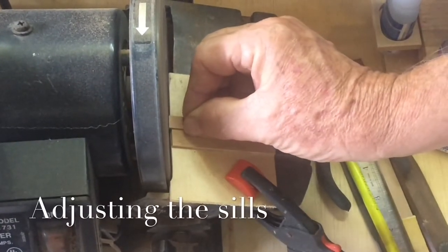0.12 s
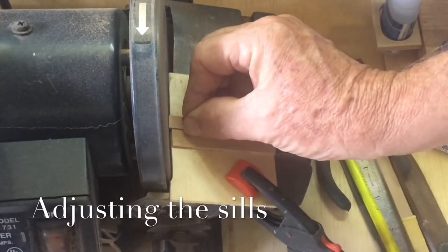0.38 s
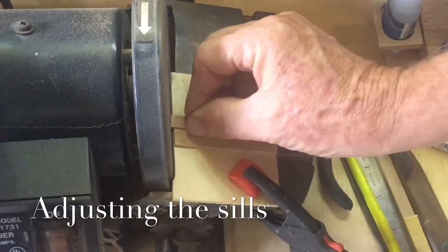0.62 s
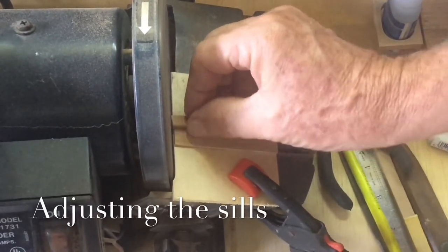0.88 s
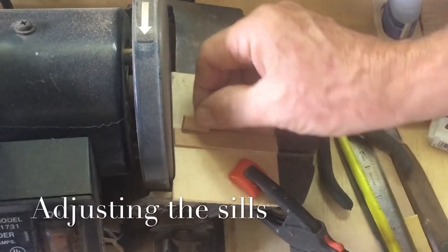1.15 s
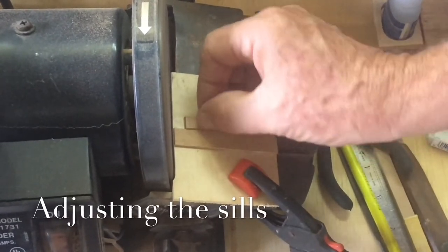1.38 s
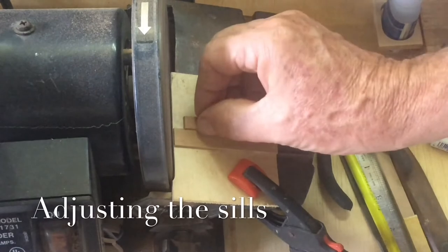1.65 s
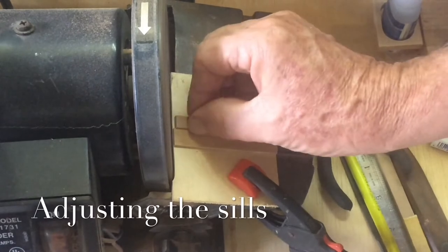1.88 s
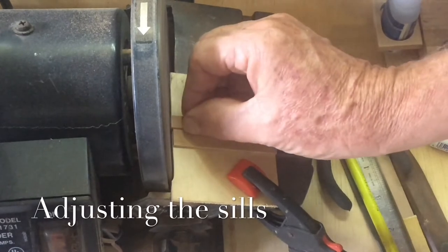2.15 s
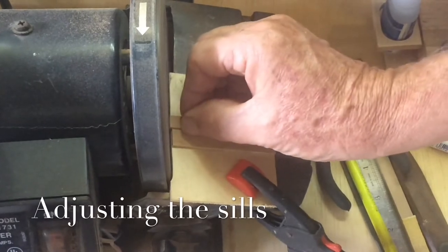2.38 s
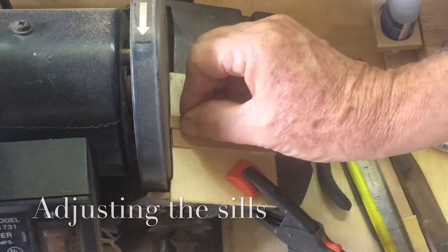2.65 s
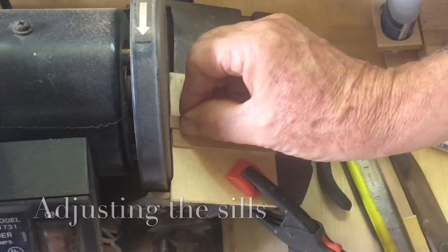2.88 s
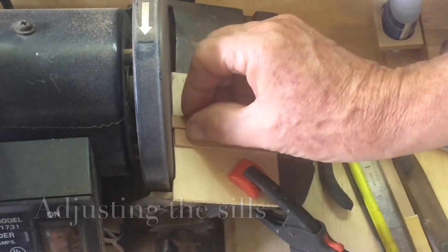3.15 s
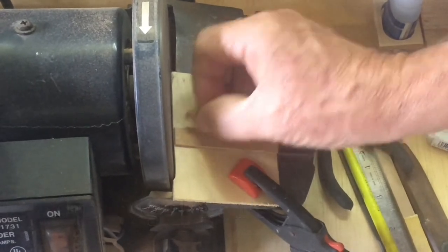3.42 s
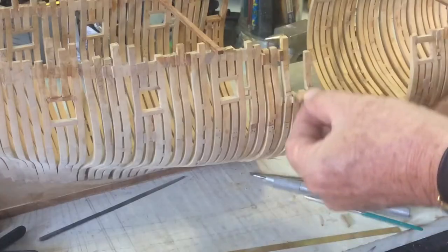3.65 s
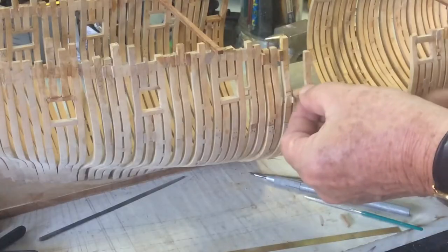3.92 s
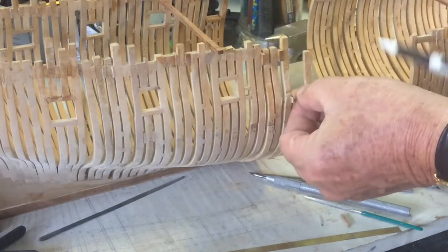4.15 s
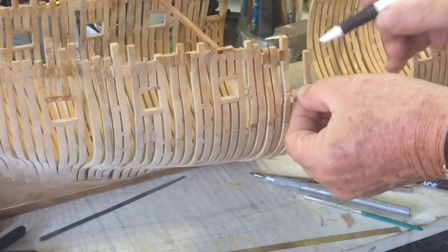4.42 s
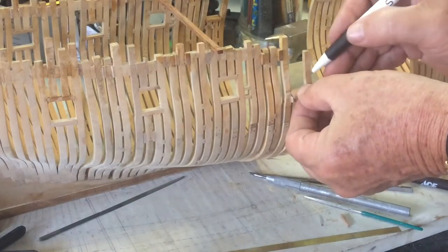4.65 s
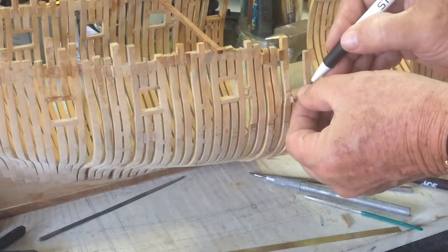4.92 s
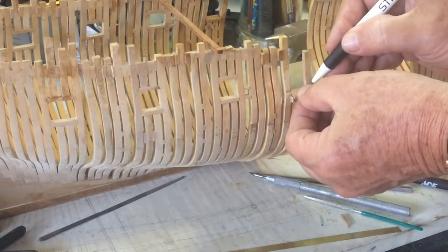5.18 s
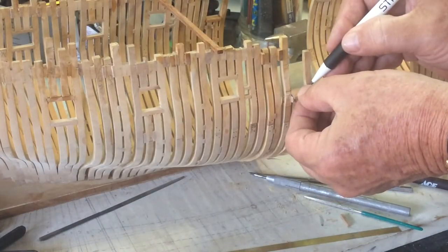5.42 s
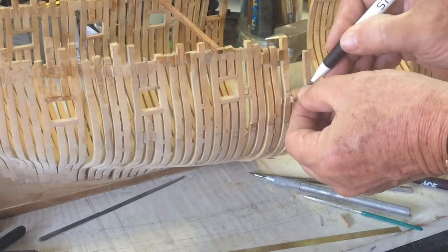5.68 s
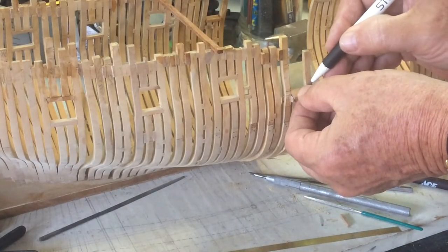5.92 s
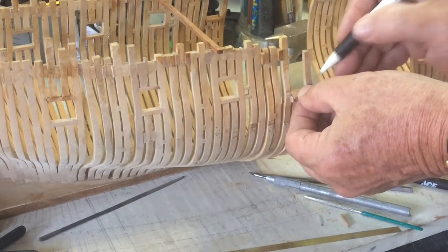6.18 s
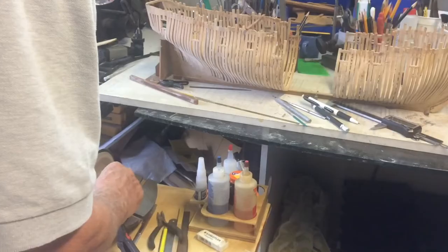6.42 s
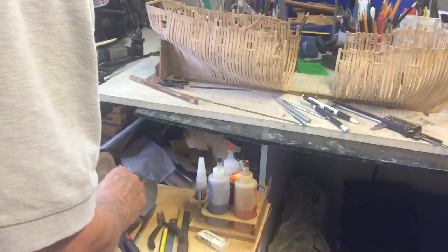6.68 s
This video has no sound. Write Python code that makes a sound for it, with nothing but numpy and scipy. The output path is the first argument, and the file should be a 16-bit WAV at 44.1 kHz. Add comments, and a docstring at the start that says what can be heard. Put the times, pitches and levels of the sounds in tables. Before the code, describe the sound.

A loud bench disc sander rasps against wood twice, cuts to a quiet humming workbench with small wooden clicks, then the sander roars farther off.

```python
"""First a bench disc sander heard close: noise through housing resonances, a throbbing bearing hiss, motor sines;
a small wooden piece is pressed twice on the grit, whose pattern repeats as one waveform per turn.
Then a quiet workbench: a beating fan-motor hum in room air, wooden parts that crack and ring, two thin squeaks.
Last, the sander from across the shop: fluttering noise through hollow resonances, with two tones.
The sound fades out and in at each change of place."""
import sys
import numpy as np
from scipy import signal
from scipy.fft import rfft, irfft, next_fast_len
from scipy.io import wavfile
from scipy.ndimage import map_coordinates

SR = 44100
rng = np.random.default_rng(int(sys.argv[2]) if len(sys.argv) > 2 else 0)


def voltage_ratio(level):
    """Linear amplitude factor for a level in decibels (scalar or array-like)."""
    return 10 ** (np.asarray(level, float) / 20)


def wav_record(signal):
    """Record a signal, one row per channel, as 16-bit PCM in the file named by sys.argv[1]."""
    frames = np.transpose(np.atleast_2d(signal))
    bounded = np.clip(frames, -1, 1)
    # unit amplitude maps onto the largest positive 16-bit level
    quanta = np.round(bounded * 32767).astype(np.int16)
    wavfile.write(sys.argv[1], SR, quanta)


N = 300321
TIME = np.arange(N) / SR


def in_time(rows, t):
    """Columns of a curve table, interpolated along its first column at t."""
    s, *columns = np.transpose(rows)
    return [np.interp(t, s, column) for column in columns]


def drift(rate_hz, size=N):
    """Random curve of spread 1: noise points joined by straight lines, two per cycle."""
    points = rng.standard_normal(size // 8 + 2)
    position = np.arange(size) * 2 * rate_hz / SR
    return 1.22 * np.interp(position, np.arange(len(points)), points)


def bell(hz, centre_hz, width_hz):
    """Resonance curve, 1 on top."""
    return 1 / (1 + (2 * (hz - centre_hz) / width_hz) ** 2)


# Time spans of the three places. Each row: fade-in start, fade-in end, fade-out start, fade-out end, all in seconds.
PLACE_FADES = [(-1, -.5, 3.462, 3.505), (3.505, 3.545, 6.335, 6.372), (6.372, 6.412, 8, 9)]


def coloured(place, spectrum, peaks=(), patchy_db=0., flicker_hz=11.0):
    """Noise for one place through a spectrum and resonances, as seven octave bands that flicker; sum of rms 1."""
    a, b = np.clip(np.searchsorted(TIME, [PLACE_FADES[place][0], PLACE_FADES[place][-1]]), 0, N)
    size = next_fast_len(b - a)
    hz = np.maximum(np.fft.rfftfreq(size, 1 / SR), 1)
    points = np.array(spectrum)
    db = np.interp(np.log(hz), np.log(points[:, 0]), points[:, 1])
    db = db + sum(lift_db * bell(hz, centre_hz, width_hz) for centre_hz, width_hz, lift_db in peaks)
    shaped = rfft(rng.standard_normal(size)) * voltage_ratio(db)
    shared = drift(flicker_hz / 2, size)
    octave = np.clip(np.log2(hz / 125), 0, 6)
    bands = np.zeros((7, N))
    for k in range(len(bands)):
        band = irfft(shaped * np.clip(1 - abs(octave - k), 0, 1), size)
        flicker = voltage_ratio(patchy_db * (shared + drift(flicker_hz, size)))
        bands[k, a:b] = (band * flicker)[:b - a]
    return bands / np.sqrt(np.mean(bands[:, a:b].sum(axis=0) ** 2))


def tones(lines, waver_db, rate_hz):
    """Sines of fixed pitch whose strength wavers."""
    total = np.zeros(N)
    for hz, db in lines:
        level = np.sqrt(2) * voltage_ratio(db + waver_db * drift(rate_hz))
        total += level * np.sin(2 * np.pi * (hz * TIME + rng.random()))
    return total


# Far roar spectrum. Each row: frequency in Hz, relative density in dB per Hz.
FAR_ROAR_SPECTRUM = [(40, -48), (110, -25), (170, -29), (300, -17), (600, -15.5), (900, -11.5),
                     (1430, -13.5), (2100, -11.5), (3300, -14.5), (8040, -15.5), (13000, -19.5),
                     (15700, -23), (16000, -70)]
# Housing resonances, far. Each row: centre in Hz, width in Hz, lift in dB.
FAR_RESONANCES = [(702, 67, 11.5), (878, 73, 11), (1120, 30, 9), (1320, 50, 8), (1586, 106, 16),
                  (1934, 76, 8.5), (2280, 16, 6), (2735, 66, 9), (3014, 66, 13.5), (5000, 150, 5),
                  (7800, 300, 7)]
# Motor tones, far. Each row: frequency in Hz, level in dB rms.
FAR_MOTOR_TONES = [(118.4, -54.5), (231.5, -41.5)]
FAR_ROAR_DB = -21.5


def far_sander():
    """The same machine across the shop: noise rings hollow resonances and flutters fast, with a gritty edge."""
    roar = coloured(2, FAR_ROAR_SPECTRUM, FAR_RESONANCES, patchy_db=0.54, flicker_hz=22.0).sum(axis=0)
    grit_edge = voltage_ratio(0.8 * drift(500.))
    return voltage_ratio(FAR_ROAR_DB) * roar * grit_edge + tones(FAR_MOTOR_TONES, waver_db=3.0, rate_hz=6.)


# Room air spectrum. Each row: frequency in Hz, relative density in dB per Hz.
AIR_SPECTRUM = [(30, -20), (60, -13), (100, -1), (150, -2), (270, -2.5), (380, -1), (500, -5.5), (800, -7),
                (1100, -13.5), (2000, -17), (5250, -20.5), (8500, -21.5), (12000, -25.5), (15700, -28),
                (16000, -70)]
AIR_DB_RMS = -41


def room_air():
    """Noise of the quiet shop, its octaves flickering slightly."""
    return voltage_ratio(AIR_DB_RMS) * coloured(1, AIR_SPECTRUM, patchy_db=0.4, flicker_hz=9.).sum(axis=0)


# Fan motor hum. Each row: frequency in Hz, level in dB rms.
FAN_TONES = [(145.3, -53), (193.3, -52.5), (230.2, -34)]
BEAT_HZ, BEAT_DEPTH, BEAT_TOP_S = 9.7, 0.19, 4.155


def fan_motor():
    """Low motor tones that beat evenly together."""
    beat = 1 + BEAT_DEPTH * np.cos(2 * np.pi * BEAT_HZ * (TIME - BEAT_TOP_S))
    return beat * tones(FAN_TONES, waver_db=.5, rate_hz=4.)


# Thin squeaks. Each row: start in seconds, length in seconds, first Hz, last Hz, width in Hz, level in dB.
THIN_SQUEAKS = [(4.417, 0.09, 12700, 11400, 400, -31.5), (4.935, 0.11, 1850, 1710, 89, -41)]


def squeaks():
    """A narrow band of noise slides quickly down to its pitch and dies away, with hiss above it."""
    out = np.zeros(N)
    for start_s, length_s, first_hz, last_hz, width_hz, db in THIN_SQUEAKS:
        t = TIME[:int(length_s * SR)]
        pitch_hz = last_hz + (first_hz - last_hz) * np.exp(-t / 0.0076)
        phase = 2 * np.pi * np.cumsum(pitch_hz) / SR
        core = drift(width_hz, len(t)) * np.cos(phase) + drift(width_hz, len(t)) * np.sin(phase)
        above = drift(3.0 * width_hz, len(t)) * np.cos(1.09 * phase)
        shape = np.minimum(t / 0.02, 1) * voltage_ratio(-22 * t / length_s)
        at = int(start_s * SR)
        out[at:at + len(t)] += voltage_ratio(db) * shape * (core + 0.5 * above)
    return out


# Wooden parts touching. Each row: start in seconds, level in dB, main ring in Hz, share of crack 0-1.
CONTACTS = [(3.525, -22, 2480, 0.8), (3.566, -19, 2060, 0.6), (3.576, -21, 8000, 0.7),
            (3.586, -13, 2010, 0.66), (3.597, -20.5, 1990, 0.3), (3.609, -15, 850, 0.22),
            (3.621, -31, 900, 0.5), (3.693, -27, 3930, 0.6), (3.699, -22.5, 2000, 0.62),
            (3.792, -29.5, 1700, 0.64), (3.822, -32.5, 1500, 0.5), (3.845, -36, 1800, 0.6),
            (5.335, -41, 1390, 0.1), (5.367, -37.5, 1500, 0.06), (5.578, -41, 1500, 0.5),
            (5.667, -33, 1800, 0.7), (6.086, -30, 6600, 0.63), (6.283, -37, 6200, 0.1)]
# Partials of a wooden part, scaled by its size. Each row: ratio to the main ring, level in dB.
WOOD_PARTIALS = [(1, 3), (1.15, -4), (1.62, -7.5), (0.54, -13.5)]
RING_T60_AT_1KHZ_S, RING_T60_SLOPE = 0.046, 0.49   # small high parts die sooner


def knocks():
    """Each contact: a broad dry crack and a short, rough woody ring, then a faint room tail."""
    out = np.zeros(N)
    t = TIME[:SR // 4]
    for start_s, db, hz, crack in CONTACTS:
        t60_s = RING_T60_AT_1KHZ_S * (1000 / hz) ** RING_T60_SLOPE
        noise = signal.lfilter([.6], [1, -.55], rng.standard_normal((2, len(t))))
        snap = noise[0] * (voltage_ratio(-60 * t / 0.0095) + voltage_ratio(-3.5 - 60 * t / 0.092))
        ring = np.zeros(len(t))
        for ratio, level_db in WOOD_PARTIALS:
            partial = np.sin(2 * np.pi * (hz * ratio * t + rng.random()))
            rub = 1 + 0.49 * drift(0.11 * hz, len(t))   # the parts rub as they meet
            ring += voltage_ratio(level_db - 60 * t / t60_s) * partial * rub
        tail = signal.lfilter([.3], [1, -.8], noise[1]) * voltage_ratio(-14.5 - 60 * t / 0.27)
        rise = np.minimum(t / 0.00063, 1)
        knock = rise * (0.89 * crack * snap + (1 - crack) * ring + tail)
        at = int(start_s * SR)
        out[at:at + len(t)] += voltage_ratio(db) * knock[:N - at]
    no_bass = signal.butter(2, 350, "high", fs=SR, output="sos")   # small parts give no bass
    return signal.sosfilt(no_bass, out)


def workbench():
    """Room air and fan motor under the handling sounds."""
    return room_air() + fan_motor() + knocks() + squeaks()


TOUCH_S, LIFT_S = .012, .03   # fade in ahead of the first row, fade out after the last


def pressed(rows, t):
    """0-1: the wood meets the disc quickly and leaves it a little slower."""
    rise = (t - rows[0][0]) / TOUCH_S + 1
    fall = (rows[-1][0] - t) / LIFT_S + 1
    return np.clip(np.minimum(rise, fall), 0, 1)


# Close roar spectrum. Each row: frequency in Hz, relative density in dB per Hz.
ROAR_SPECTRUM = [(150, -42), (220, -28.5), (320, -13.5), (500, -13.5), (610, -14), (800, -9), (1150, -14),
                 (1600, -13.5), (2700, -13), (8500, -15.5), (12900, -15), (14500, -22.5), (15300, -23),
                 (15600, -70)]
# Housing resonances, close. Each row: centre in Hz, width in Hz, lift in dB.
RESONANCES = [(344, 63, 5), (415, 49, 15), (456, 8.6, 13), (666, 7.1, 5), (779.4, 41, 9), (850, 14, 6),
              (995, 33, 7.5), (1300, 143, 11), (1487, 94, 5), (2185, 36, 6), (2630, 67, 4)]
# Rumble spectrum. Each row: frequency in Hz, relative density in dB per Hz.
RUMBLE_SPECTRUM = [(25, -19), (80, -4), (125, 4.5), (230, 0.5), (300, 3), (400, -36)]
# Motor tones, close. Each row: frequency in Hz, level in dB re the rumble reference.
MOTOR_TONES = [(59.4, -13), (118.4, -5.5), (142, -10.5), (178, -10.5), (231.5, -8)]
# Bearing throb of the treble hiss. Each row: multiple of the cage rate, depth 0-1.
BEARING_THROB = [(1, 0.11), (3, 0.09), (4, 0.08), (7, 0)]
CAGE_HZ = 22.92   # the ball cage of the bearing turns slower than the shaft
ROAR_DB, MACHINE_WANDER_DB = -17, 0.03   # before the gain control
RUMBLE_REF_DB, RUMBLE_WANDER_DB = -38.5, 0.5
RUMBLE_SUPPRESSED_DB = -2   # the recorder's noise suppression lowers the rumble while wood is pressed on


def idling():
    """Air roar rings the housing; the bearing makes the treble throb; motor tones sit in the rumble."""
    machine_db = MACHINE_WANDER_DB * drift(1.41)
    suppression_db = RUMBLE_SUPPRESSED_DB * sum(pressed(rows, TIME) for rows in WOOD_TOUCHES)
    rumble_db = RUMBLE_REF_DB + RUMBLE_WANDER_DB * drift(4.4) + suppression_db
    bands = coloured(0, ROAR_SPECTRUM, RESONANCES, patchy_db=0.37, flicker_hz=9.)
    throb = 1 + sum(depth * np.cos(2 * np.pi * k * CAGE_HZ * TIME) for k, depth in BEARING_THROB)
    treble = bands[5:].sum(axis=0) * throb * voltage_ratio(1.5 * drift(400.))   # octave bands centred on 4 kHz and up
    roar = bands[:5].sum(axis=0) + treble
    rumble_noise = voltage_ratio(-2.5) * coloured(0, RUMBLE_SPECTRUM, patchy_db=1.5).sum(axis=0)
    rumble = rumble_noise + tones(MOTOR_TONES, waver_db=2.5, rate_hz=3.61)
    return voltage_ratio(machine_db) * (voltage_ratio(ROAR_DB) * roar + voltage_ratio(rumble_db) * rumble)


# Grit pattern: its strongest multiples of the turn rate; the rest is chance.
STRONG_MULTIPLES = [26, 30, 31, 33, 35, 36, 45, 46, 60, 61, 66, 68, 71, 73, 74, 78, 82, 83, 85, 98, 103,
                    107, 133, 158, 159, 162, 166]
# Levels of those multiples in dB, before touch colour, squeal and pressure.
STRONG_DB = [-37, -41, -34, -32, -35.5, -34.5, -32, -37.5, -43, -39.5, -40.5, -36, -39, -35, -40, -35.5,
             -36, -38, -32, -37.5, -39, -35.5, -36, -51, -37, -41, -47]
WEAK_DB, WEAK_SPREAD_DB = -44.0, 3.0   # the other multiples, before a treble slope


def grit_pattern_db(hz):
    """Strength of each multiple of the turn rate, the same every turn."""
    db = WEAK_DB + WEAK_SPREAD_DB * rng.standard_normal(len(hz))
    db = db - 13.0 * np.log2(np.maximum(hz / 7000, 1))
    db[hz < 1400] = -np.inf
    db[STRONG_MULTIPLES] = STRONG_DB
    return db


# Wood on the disc, one list per touch, from touch to lift.
# Each row: time in seconds, pressure in dB, lift of the squeal in dB.
WOOD_TOUCHES = [
    [(0, 3, 8), (.1, 3.5, 6), (.21, 3.5, -1), (.4, 4.5, -3), (.555, 0, 3.5), (.6, -7, 0)],
    [(2.082, 7.5, 5), (2.15, 7.5, 9), (2.2, 4.5, -0.5), (2.31, 8, 6.5), (2.45, 6.5, 7.5), (2.6, 5, -1),
     (2.94, 4, -4), (3.01, -4, 5)],
]
# The wood is held differently and passes the pattern with another colour.
# Each row: frequency in Hz, first touch in dB, second touch in dB.
TOUCH_COLOUR = [(1500, -3, -6.5), (1950, 1.5, -2), (2300, 0.5, -3.5), (2600, 2.5, 0), (3240, -1, 2),
                (3630, 4, 3.5), (3970, -1.5, 5.5), (5000, -3, 0), (6560, 5, 0), (6850, 0, -8),
                (7760, 0, 3.5), (9150, 1.5, 5.5)]
# The ring that squeals in each touch. Each row: centre in Hz, width in Hz.
SQUEAL_RINGS = [(1950, 500), (4130, 620)]
TURN_HZ = 59.41   # disc turns per second
WEAR, WEAR_SLOPE, WEAR_TURNS = 0.43, 0.2, 1.9
BITE = 0.72
DUST_DB, DUST_HZ = -31, 4200


def sanding():
    """The same grains pass the wood every turn: one waveform per turn, changing slowly as the wood wears."""
    out, size = np.zeros(N), 4096   # samples per stored turn
    multiples = np.arange(200)
    hz = multiples * TURN_HZ
    loose = coloured(0, [(1200, -23), (2000, -9), (4200, 5), (9500, -12), (13000, -29), (15200, -30), (15600, -70)],
                     patchy_db=0.5).sum(axis=0)
    pattern_db = grit_pattern_db(hz)
    colours_db = in_time([(np.log(f), *db) for f, *db in TOUCH_COLOUR], np.log(hz + 1))
    for rows, colour_db, (squeal_hz, width_hz) in zip(WOOD_TOUCHES, colours_db, SQUEAL_RINGS):
        a, b = max(int((rows[0][0] - TOUCH_S) * SR), 0), int((rows[-1][0] + LIFT_S) * SR)
        turns = (TIME[a:b] - TIME[a]) * TURN_HZ
        count = int(turns[-1]) + 2
        _, squeal_db = in_time(rows, TIME[a] + np.arange(count) / TURN_HZ)
        db = pattern_db + colour_db + squeal_db[:, None] * bell(hz, squeal_hz, width_hz)
        # the disc wobbles and bites twice a turn, which bunches the phases
        wobble = 1 + BITE * np.cos(4 * np.pi * np.arange(size) / size)
        phases = np.angle(rfft(wobble * rng.standard_normal(size)))[multiples]
        keep = np.exp(-1 / WEAR_TURNS)
        chance = rng.standard_normal((100, len(hz), 2)) @ [1, 1j]
        worn = signal.lfilter([np.sqrt(1 - keep ** 2)], [1, -keep], chance, axis=0)[-count:]
        change = 1 + WEAR * (hz / DUST_HZ) ** WEAR_SLOPE * worn
        waves = irfft(voltage_ratio(db) * np.exp(1j * phases) * change, size) * size / np.sqrt(2)
        waves = np.hstack([waves, waves[:, :1]])
        # each turn's waveform blends into the next
        repeating = map_coordinates(waves, [turns, turns % 1 * size], order=1)
        pressure_db, squeal_db = in_time(rows, TIME[a:b])
        # torn fibres do not repeat
        dust_db = DUST_DB + squeal_db / 2 * bell(DUST_HZ, squeal_hz, width_hz)
        dust = voltage_ratio(dust_db) * loose[a:b] * (1 + BITE / 2 * np.cos(4 * np.pi * turns))
        out[a:b] = voltage_ratio(pressure_db) * pressed(rows, TIME[a:b]) * (repeating + dust)
    return out


GAIN_AHEAD_S, GAIN_SMOOTH_S = 0.011, .03   # reads the loudness ahead, smoothed
GAIN_FROM_DB, GAIN_SHARE = -18.5, 0.78   # takes back this share of all above that level


def gain_control(x):
    """The recorder follows the loudness and turns down what exceeds its level."""
    r = np.exp(-1 / (GAIN_SMOOTH_S * SR))
    start = np.mean(x[:int(GAIN_SMOOTH_S * SR)] ** 2)
    ahead = np.roll(x, -int(GAIN_AHEAD_S * SR))
    power, _ = signal.lfilter([1 - r], [1, -r], ahead ** 2, zi=[r * start])
    excess_db = np.maximum(10 * np.log10(power + 1e-12) - GAIN_FROM_DB, 0)
    return x * voltage_ratio(-GAIN_SHARE * excess_db)


def scene():
    """Three places one after another, heard by one microphone; both channels alike."""
    close_sander = gain_control(idling() + sanding())
    mono = np.zeros(N)
    for fade_s, sound in zip(PLACE_FADES, [close_sander, workbench(), far_sander()]):
        mono += np.interp(TIME, fade_s, [0, 1, 1, 0]) * sound
    return np.array([mono, mono])


def band_limit(x):
    """A steep low-pass at the top of the band."""
    return signal.sosfilt(signal.butter(12, 16520, fs=SR, output="sos"), x)


def record(dry):
    """Passes on the finished mix."""
    return band_limit(dry)


dry = scene()
out = record(dry)
wav_record(out)
```